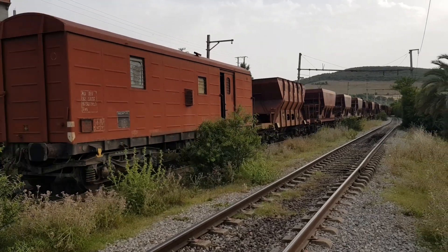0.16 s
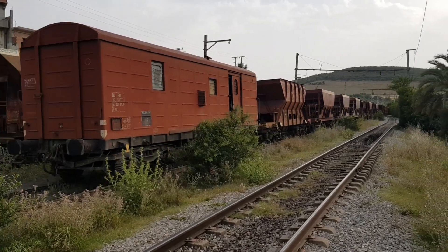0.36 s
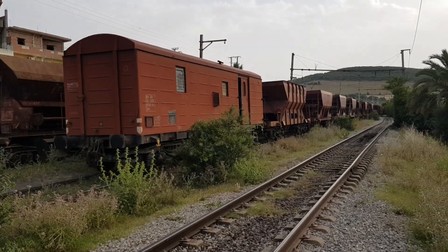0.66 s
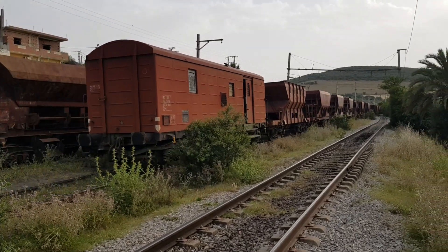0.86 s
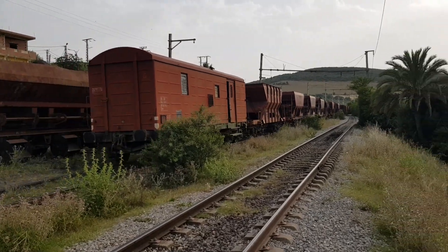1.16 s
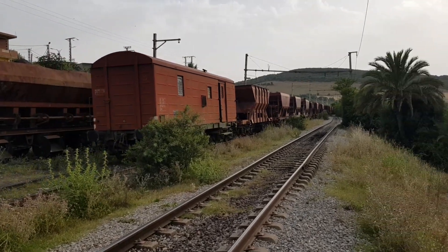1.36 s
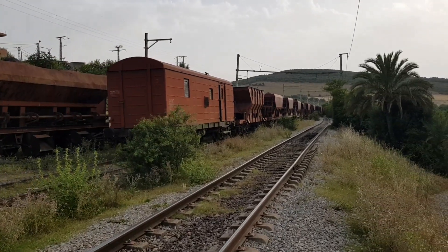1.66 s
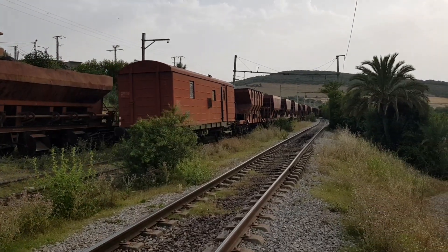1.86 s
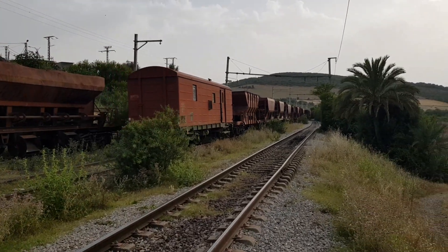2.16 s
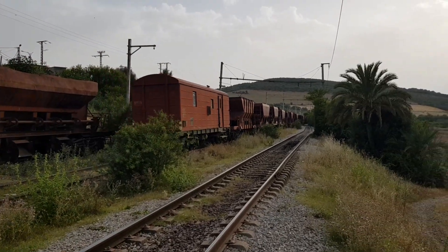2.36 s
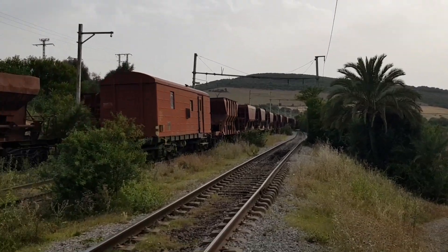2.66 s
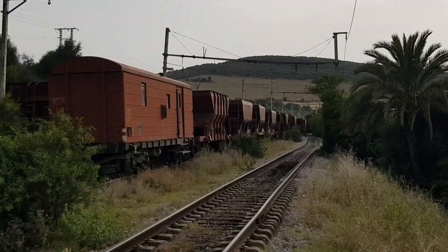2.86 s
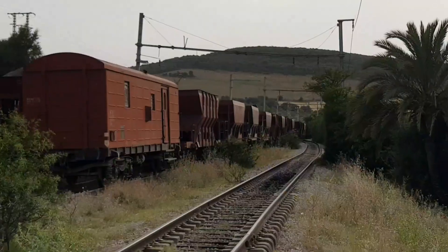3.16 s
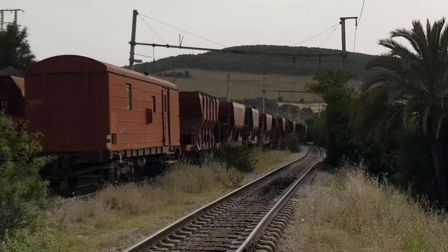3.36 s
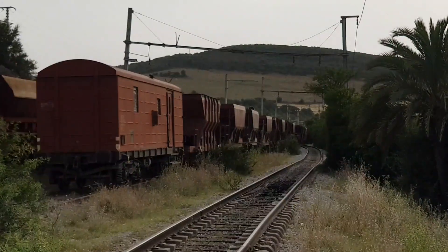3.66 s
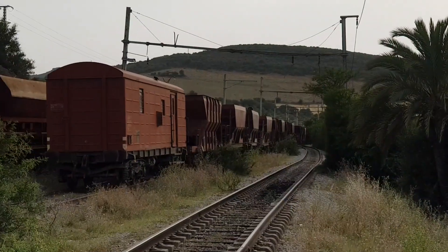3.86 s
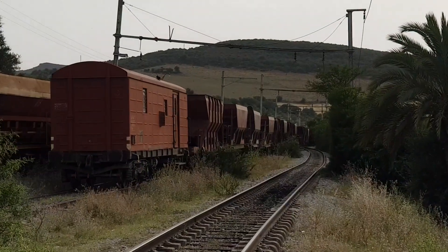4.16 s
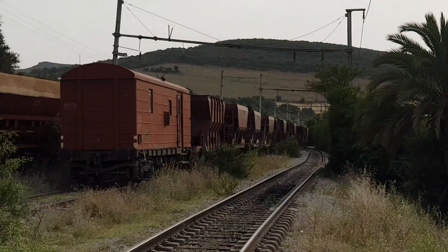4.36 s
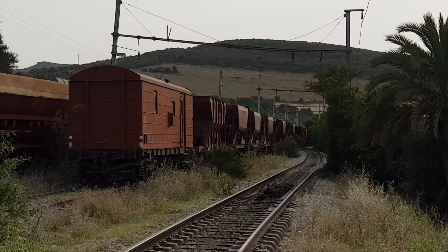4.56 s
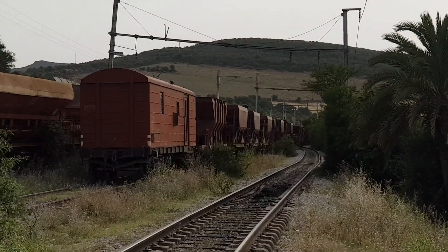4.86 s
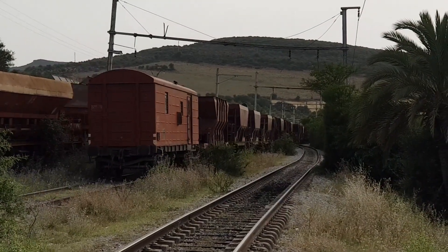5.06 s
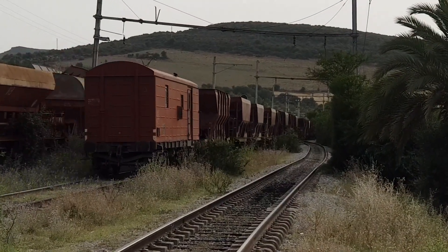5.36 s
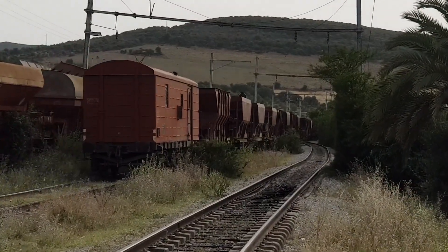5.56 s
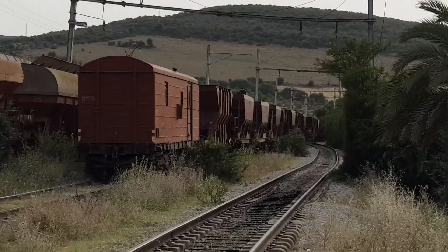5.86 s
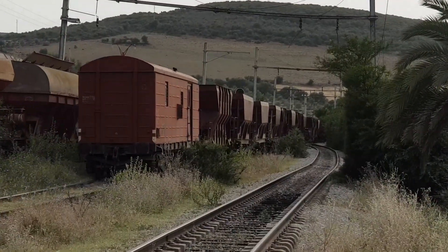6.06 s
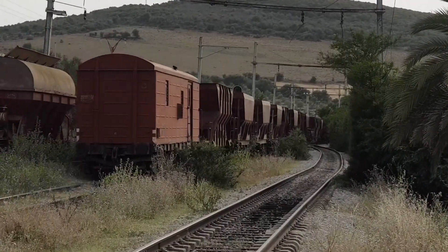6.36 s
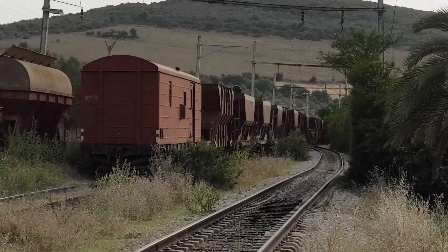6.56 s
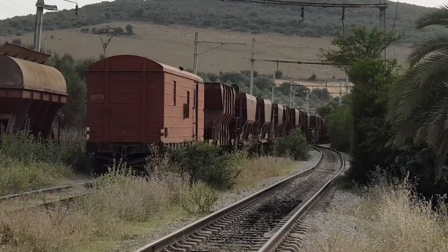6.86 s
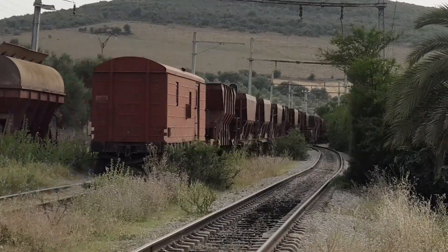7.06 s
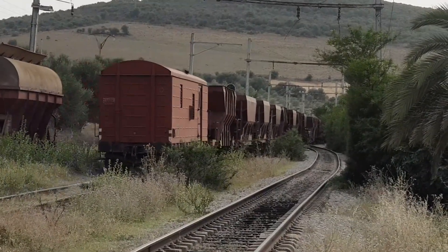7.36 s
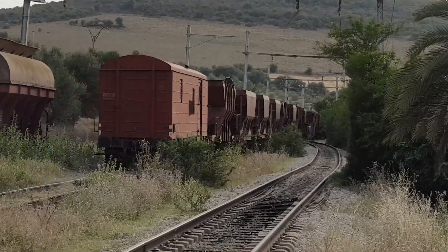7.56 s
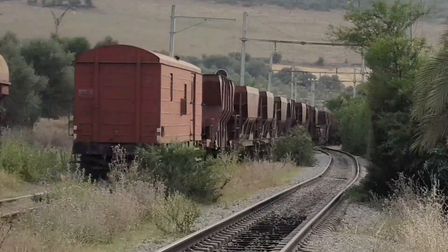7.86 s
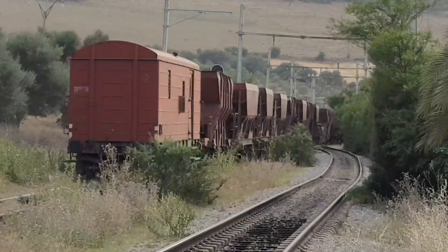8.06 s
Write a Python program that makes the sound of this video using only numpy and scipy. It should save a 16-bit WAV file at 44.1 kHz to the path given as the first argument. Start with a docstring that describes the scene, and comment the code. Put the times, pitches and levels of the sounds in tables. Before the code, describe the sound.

Close by the track, a hard steel clank rings out at once, followed by gritty flange scraping, thin squeals and chattering brake gear. The last freight wagons then roll slowly away with deep rumble, dull axle thumps, hollow body knocks and hissing, singing wheels. Smaller clanks return midway. Treble fades with distance, leaving low rumble, soft wind buffeting on the stereo microphone and a single tiny bird chirp at the end.

```python
"""From the lineside, some ten metres off, the tail of a loaded freight train rolls slowly away.
First comes a loud steel clank, a struck ring over bogie-frame modes; flanges scrape and squeal in grit and tones.
Wagons then rumble, thump and boom from grains and damped modes; wheels roar, sing and hiss in shaped noise,
and brake gear chatters in ticks. The grinding shifts left in the curve, then the treble fades with distance.
Noise gusts buffet the two-port microphone at times; near the end a bird chirps once, a falling tone."""
import sys
import numpy as np
from scipy import signal
from scipy.fft import rfft, irfft, next_fast_len
from scipy.io import wavfile
from scipy.ndimage import uniform_filter1d, map_coordinates

SR = 44100
rng = np.random.default_rng(int(sys.argv[2]) if len(sys.argv) > 2 else 0)


def file_out(sig):
    """Save sig as 16-bit WAV at sys.argv[1]."""
    # one column per channel
    cols = np.atleast_2d(sig).T
    # limit, then scale
    lim = np.clip(cols, -1, 1)
    pcm = np.round(lim * 32767).astype(np.int16)
    wavfile.write(sys.argv[1], SR, pcm)


N = 362502


def amp(db):
    """Decibels to gain."""
    return 10 ** (np.asarray(db) / 20)


def bins(size):
    """Frequencies in Hz of a spectrum of that many samples, kept just above zero for the logarithm."""
    return np.fft.rfftfreq(size, 1 / SR) + 1e-3


def along(table, hz):
    """Read (frequency, value) points on a log-frequency axis."""
    rows = np.array(table)
    return np.interp(np.log(hz), np.log(rows[:, 0]), rows[:, 1])


def noise():
    """Two unrelated white noises."""
    return rng.standard_normal((2, N))


def walk(rate):
    """Random levels held 1 / rate seconds and slewed from one to the next; spread near 1."""
    hold = max(int(SR / rate), 1)
    steps = np.repeat(rng.standard_normal(N // hold + 1), hold)
    return np.sqrt(3 / 2) * uniform_filter1d(steps, hold)[:N]


def grit(rate, spread_db, decay_s, share):
    """Noise partly broken into tiny impacts, so many a second and of very unequal size."""
    sizes_db = spread_db * np.minimum(rng.exponential(size=N), 4)
    hits = (rng.random(N) < rate / SR) * amp(sizes_db) ** 2
    energy = signal.lfilter([1], [1, -np.exp(-2 / (decay_s * SR))], hits)
    share = np.clip(share, 0, 1)
    return noise() * np.sqrt(1 - share + share * energy / energy.mean())


def strike(rise_s, t60):
    """Envelope that swells to 1, then loses 60 dB in t60 seconds."""
    t = np.arange(int(SR * (t60 + rise_s))) / SR
    decay = np.exp(-np.log(1000) * np.maximum(t - rise_s, 0) / t60)
    return np.minimum(t / rise_s, 1) * decay


def ring(hz, rise_s, t60):
    """One damped mode."""
    envelope = strike(rise_s, t60)
    return envelope * np.sin(2 * np.pi * hz * np.arange(len(envelope)) / SR)


def add(out, start_s, x):
    """Mix x into out from a given time."""
    i = max(int(start_s * SR), 0)
    out[..., i:i + x.shape[-1]] += x[..., :max(N - i, 0)]


# how alike the two microphone ports hear: (frequency [Hz], likeness [0-1])
PORT_LIKENESS = [(60, .9), (140, .86), (300, .98), (430, .78), (800, .8), (1050, .4), (1400, .55),
                 (1650, .25), (2050, .65), (2800, .35), (3700, .5), (5000, .25), (10000, .45), (15000, .35)]
# balance of the ports: (frequency [Hz], left minus right [dB])
PORT_LEAN = [(60, 0.5), (300, -0.7), (450, -1.5), (640, 4), (1000, -0.5), (1550, 1), (1900, -5),
             (2400, -8.5), (3200, -1), (4200, -1.5), (5300, 5), (6500, 9.5), (7900, 15), (9500, 9),
             (11600, 5), (15000, 15)]
# phase by which the left port leads; negative where it lags: (frequency [Hz], lead [rad])
PORT_LEAD = [(80, -.05), (280, -.2), (400, 0.06), (600, 1.0), (800, 0.4), (950, 1.1), (1350, 0.6),
             (1700, -1.7), (2000, -0.4), (2400, 1.4), (2800, 2), (3100, 1.1), (4000, 2.2), (6000, 1.3),
             (6400, .7)]


def radiate(pair, spectrum, modes=(), modes_db=0):
    """Two excitations pass a spectrum and its resonances to the two ports; unit level."""
    size = next_fast_len(pair.shape[-1], real=True)
    hz = bins(size)
    power = amp(along(spectrum, hz)) ** 2
    for centre, width, db in modes:
        power = power + amp(db + modes_db) ** 2 / (1 + ((hz - centre) / width) ** 2) ** 2
    mid, side = rfft(pair, size) * np.sqrt(power)
    alike = np.clip(along(PORT_LIKENESS, hz), -1, 1)
    mid, side = mid * np.sqrt(1 + alike), side * np.sqrt(1 - alike)
    lean = amp(along(PORT_LEAN, hz) / 2)
    left = (mid + side) * lean * np.exp(1j * along(PORT_LEAD, hz))
    right = (mid - side) / lean
    out = irfft(np.array([left, right]) / np.hypot(lean, 1 / lean), size)[:, :pair.shape[-1]]
    return out / out.mean(axis=0).std()


def place(tone, hz):
    """A narrow sound leans to the port that favours its pitch, with that pitch's phase lead."""
    lean = amp(along(PORT_LEAN, hz) / 2)
    analytic = signal.hilbert(tone, next_fast_len(len(tone)))[:len(tone)]
    left = np.real(analytic * np.exp(1j * along(PORT_LEAD, hz)))
    return np.array([left * lean, tone / lean]) * 2 / (lean + 1 / lean)


START_M, SPEED_M_S = 10.7, 2.81  # distance of the last wagon at the start, and its speed
FAR_S = 6.65  # from here on, far down the curve, the high sounds die away faster


def receding(start_db, loss_db, fade_db_per_s=0):
    """Gain of a steady sound losing loss_db per doubling of distance, and more once the train is far."""
    t = np.arange(N) / SR
    doublings = np.log2(1 + SPEED_M_S * t / START_M)
    return amp(start_db - loss_db * doublings - fade_db_per_s * np.maximum(t - FAR_S, 0))


def spells(rows, attack_s, release_s, arch_db=0):
    """Gain of overlapping (start, length, level) spells: attack, a hold that may arch, release."""
    t, power = np.arange(N) / SR, np.zeros(N)
    for s, length_s, db in rows:
        on = slice(max(int(s * SR), 0), int((s + length_s + release_s) * SR))
        age = t[on] - s
        arch = arch_db * (1 / 2 - np.minimum((2 * age / length_s - 1) ** 2, 1))
        edges = np.minimum(age / attack_s, 1 - (age - length_s) / release_s)
        power[on] += (amp(db + arch) * np.clip(edges, 0, 1)) ** 2
    return np.sqrt(power)


# a wheelset leans on the rail and rubs; levels before the arch of each rub:
# (start [s], length [s], rail roar [dB], hiss [dB], flange grinding [dB])
WHEELSET_RUBS = [(-0.03, 0.058, -41.5, -39, -46), (0.088, 0.19, -40.5, -39, -37.5),
                 (0.332, 0.13, -52, -48, -54), (0.907, 0.16, -46, -42, -51),
                 (1.12, 0.096, -45.5, -49.5, -56), (1.241, 0.076, -46.5, -42, -60),
                 (1.426, 0.24, -47, -51, -67), (1.846, 0.13, -48.5, -46.5, -58),
                 (2.178, 0.15, -51, -45.5, -49.5), (2.407, 0.25, -45.5, -50, -50),
                 (3.106, 0.047, -49, -41.5, -56), (3.19, 0.14, -69, -51.5, -56),
                 (3.43, 0.26, -64, -50, -55), (3.75, 0.087, -54, -49, -61), (4.043, 0.36, -48.5, -48, -60),
                 (4.377, 0.18, -46, -44, -47.5), (4.606, 0.16, -48, -46.5, -52.5),
                 (4.684, 0.14, -46.5, -47.5, -50), (4.878, 0.17, -60, -49, -50.5),
                 (5.02, 0.19, -54, -64, -51), (5.37, 0.22, -50.5, -57, -60),
                 (5.754, 0.32, -52.5, -61, -52.5), (6.105, 0.27, -51.5, -71, -61),
                 (6.305, 0.46, -47.5, -52.5, -57), (6.853, 0.19, -52, -50.5, -56.5),
                 (7.4, 0.032, -62, -56, -62)]


def rubbing(column):
    """Gain of the rubs in one of their level columns."""
    rows = [(row[0], row[1], row[column]) for row in WHEELSET_RUBS]
    return spells(rows, attack_s=0.017, release_s=0.082, arch_db=3.5)


def shimmer(x, depth_db, spacing_hz, hold_s):
    """Many wheels and paths give a fine, changing ripple of peaks, while broader resonances ring in turns."""
    hz, s, frames = signal.stft(x, SR, nperseg=2048, noverlap=1536)

    def ripple(step_hz, step_s):
        """A smooth random surface over frequency and time."""
        where = np.meshgrid(hz / step_hz, s / step_s, indexing="ij")
        return map_coordinates(rng.standard_normal(size=(600, 120)), where, order=3, mode="wrap")

    turns_db = 1.3 * ripple(step_hz=330, step_s=.5)
    gain = amp(depth_db * ripple(spacing_hz, hold_s) + turns_db)
    level_frames = frames * gain / np.sqrt(np.mean(gain ** 2))
    return signal.istft(level_frames, SR, nperseg=2048, noverlap=1536)[1][:, :N]


def drift(pair, shift_db):
    """The treble moves toward the left port as the wagons enter the curve; the summed level stays."""
    # shift_db is left minus right, before and after
    lean = amp(np.interp(np.arange(N) / SR, (4.25, 4.6), shift_db) / 2)
    leaned_power = (pair[0].var() * lean ** 2 + pair[1].var() / lean ** 2) / 2
    return pair * np.array([lean, 1 / lean]) * pair.std() / np.sqrt(leaned_power)


# spectrum of the ground rumble: (frequency [Hz], relative power per Hz [dB])
RUMBLE_SPECTRUM = [(18, -37), (28, -41), (36, -12), (45, -1.5), (62, -0.5), (82, 0.5), (102, -6),
                   (140, -7.5), (200, -11.5), (260, -20.5), (340, -22), (570, -76)]
# spectrum of the hollow bodies: (frequency [Hz], relative power per Hz [dB])
BOOM_SPECTRUM = [(150, -22.5), (230, -5.5), (270, -0.5), (318, -1), (355, -4.5), (400, -16.5), (480, -73),
                 (800, -73)]
# the wagons lurch and the rumble swells: (start [s], length [s], level [dB])
WAGON_LURCHES = [(0.1, 0.33, -38), (0.68, 0.64, -33.5), (1.58, 0.044, -25), (2.08, 0.73, -32.5),
                 (3.05, 0.11, -32), (4.2, 0.3, -36), (5.17, 0.43, -31.5), (6.28, 0.29, -36),
                 (6.72, 0.32, -32), (7.5, 0.18, -32.5)]
# the hollow wagon bodies drum, before the boom's trim: (start [s], length [s], level [dB])
BODY_DRUMMING = [(0.1, 0.25, -37), (0.33, 0.84, -37.5), (1.2, 0.43, -32.5), (1.83, 0.4, -34),
                 (2.48, 0.726, -34.5), (3.43, 0.52, -35.5), (3.97, 0.53, -32)]
# knocks that boom in the bodies, before their trim: (time [s], level [dB], pitch [Hz])
BODY_KNOCKS = [(0.104, -23, 328), (0.178, -16, 258), (0.632, -16, 272), (1.3, -13.5, 302), (1.44, -15, 308),
               (1.529, -17, 256), (2.149, -11.5, 324.4), (2.809, -20, 311), (2.899, -12.5, 306),
               (3.43, -13, 304), (3.678, -17.5, 310), (3.783, -17, 343), (4.114, -12, 332),
               (4.232, -17, 328), (4.299, -17.5, 293), (4.717, -20.5, 264), (7.912, -27, 224)]
# heavy thumps of the axles, before their trim: (time [s], level [dB], pitch [Hz])
AXLE_THUMPS = [(0.103, -16, 129), (0.931, -8.5, 77), (1.044, -7.5, 78.7), (1.609, -17, 81),
               (2.089, -11.5, 93.5), (2.401, -13, 123), (2.567, -9, 78), (3.069, -17, 57),
               (4.228, -7.5, 79), (4.455, -10.5, 70), (4.71, -14, 132), (5.587, -8.5, 86.6),
               (6.36, -16, 151), (6.551, -16.5, 152), (6.971, -15, 73), (7.272, -11.5, 95),
               (7.608, -12, 84), (7.92, -9, 76.6)]


def wagons():
    """Axles shake the ground and the frames; a jumble of knocks booms in the hollow bodies."""
    lurching = spells(WAGON_LURCHES, attack_s=0.0079, release_s=0.062)
    rumble_gain = np.hypot(receding(start_db=-29.5, loss_db=0.9), lurching)
    drumming = spells(BODY_DRUMMING, attack_s=0.0084, release_s=0.02)
    boom_gain = amp(-1.0) * np.hypot(receding(start_db=-35, loss_db=4.86), drumming)
    out = radiate(grit(36, 1.1, 0.056, 0.036), RUMBLE_SPECTRUM) * rumble_gain
    out += radiate(grit(45, 0.74, 0.011, 0.3), BOOM_SPECTRUM) * boom_gain
    for s, db, hz in BODY_KNOCKS:
        add(out, s - .003, amp(db - 6.5) * ring(hz, 0.0061, 0.15))
    for s, db, hz in AXLE_THUMPS:
        add(out, s - .003, amp(db - 8.5) * ring(hz, 0.019, 0.15))
    return out


# mode levels here are before the offset each layer gives them
# resonances of the rail under rolling: (frequency [Hz], width [Hz], level [dB])
RAIL_RESONANCES = [(500, 94, -3.5), (806, 79, 2), (1098, 110, -2), (1352, 75, -5.5), (1600, 57, -12.5)]
# lowest wheel modes, which sing all the time: (frequency [Hz], width [Hz], level [dB])
SINGING_MODES = [(1970, 82, 9), (2210, 100, 0), (2185, 82, 3.5), (2608, 44, 7.5)]
# higher modes of the wheel discs: (frequency [Hz], width [Hz], level [dB])
DISC_MODES = [(3130, 56, -1), (3990, 130, 6), (4730, 23, 8.5), (5250, 83, 5), (5640, 54, -5),
              (6210, 17, 10), (6800, 380, 3), (7600, 35, -2), (9770, 120, -5.5), (11500, 130, -5),
              (12138, 70, -10), (13610, 50, -10), (14186, 60, -2), (14810, 60, -4)]
# spectrum of the rail roar: (frequency [Hz], relative power per Hz [dB])
ROAR_SPECTRUM = [(250, -12), (420, 2), (620, -1.5), (950, -9.5), (1450, -0.5), (1700, -8.5), (2400, -12.5),
                 (3500, -16), (6000, -62)]
# spectrum of the singing wheels: (frequency [Hz], relative power per Hz [dB])
SING_SPECTRUM = [(1400, -38), (1750, -2), (1950, 6), (2400, 1), (2800, -3.5), (3400, -14), (5000, -37)]
# spectrum of the fine hiss: (frequency [Hz], relative power per Hz [dB])
HISS_SPECTRUM = [(2000, -4), (2800, 1), (3200, 4.5), (3700, 1), (5200, -2), (5700, -3), (6900, -6),
                 (7400, -14), (7900, -18), (12000, -20), (16000, -34)]


def rolling():
    """Rough treads make the rail roar and the wheels sing, a finer hiss on top; rubs swell all three."""
    rub = rubbing(column=2)
    roar_gain = np.hypot(receding(start_db=-42, loss_db=3.42), rub) * amp(0.23 * walk(23))
    roar_grains = grit(82, 0.93, 0.046, 0.42)
    roar = radiate(roar_grains, ROAR_SPECTRUM, RAIL_RESONANCES, modes_db=1.5) * roar_gain

    # the singing is 1 dB weaker at first
    early = amp(np.interp(np.arange(N) / SR, (2, 2.03), [-1, 0]))
    steady_sing = receding(start_db=-43.5, loss_db=5, fade_db_per_s=2.5)
    sing_gain = early * np.hypot(steady_sing, amp(-2) * rub) * amp(0.79 * walk(21))
    sing_grains = grit(110, 1.6, 0.032, 0.44)
    sing = radiate(sing_grains, SING_SPECTRUM, SINGING_MODES, modes_db=-1.0) * sing_gain

    steady_hiss = receding(start_db=-46, loss_db=3.6, fade_db_per_s=3)
    hiss_gain = np.hypot(steady_hiss, rubbing(column=3)) * amp(0.8 * walk(22))
    fine_grains = grit(200, 2.6, 0.012, 0.42)
    hiss = radiate(fine_grains, HISS_SPECTRUM, DISC_MODES[:6], modes_db=-9.0) * hiss_gain

    low = shimmer(roar + sing, depth_db=2.0, spacing_hz=69.6, hold_s=.2)
    high = shimmer(hiss, depth_db=3.0, spacing_hz=79.96, hold_s=.2)
    return low + drift(high, shift_db=(-0.5, 1.8))


# spectrum of steel grinding on steel: (frequency [Hz], relative power per Hz [dB])
GRIND_SPECTRUM = [(1500, -25), (3200, 1.5), (5000, 7.5), (7000, 7.5), (7900, -2), (9000, 3.5), (10500, -1),
                  (12000, 5), (14000, 2), (16000, -7)]
# flanges catching the rail, before their trim: (time [s], level [dB], rise [s], decay by 60 dB [s])
FLANGE_SCRAPES = [(0.095, -25.5, 0.0017, 0.098), (.113, -24, .002, .06), (.166, -31, .003, .08),
                  (0.22, -22, 0.013, 0.23), (.255, -29, .005, 0.11), (.303, -30.5, 0.0035, 0.27),
                  (.441, -40, 0.0027, 0.078), (.930, -41, .003, 0.081), (1.256, -40, 0.013, 0.25),
                  (1.857, -37.5, 0.0063, 0.079), (1.942, -48, 0.0028, .15), (2.184, -42, .002, 0.088),
                  (2.358, -43.5, .003, 0.27), (2.495, -43, .005, 0.34), (3.114, -36.5, 0.0079, 0.16),
                  (3.191, -45, 0.0028, .1), (3.237, -48, .004, .14), (3.50, -44, .01, 0.16),
                  (4.397, -49, .005, 0.27), (4.47, -46, 0.007, 0.33), (4.745, -39, 0.0087, 0.44),
                  (5.677, -47.5, .003, 0.37), (5.828, -42.5, 0.005, 0.25), (5.985, -41.5, 0.0033, 0.3)]


def flanges():
    """Flanges grind on the rail head in gritty slips that ring the wheel discs, and now and then catch hard."""
    catches = np.zeros(N)
    for s, db, rise_s, t60 in FLANGE_SCRAPES:
        add(catches, s, (amp(db - 1.0) * strike(rise_s, t60)) ** 2)
    steady = receding(start_db=-59.5, loss_db=2.5, fade_db_per_s=19)
    unevenness_db = 1.1 * walk(25)
    rub = np.hypot(steady, rubbing(column=4)) * amp(unevenness_db)
    grains = grit(200, 2.6, 0.0055, 0.42)
    steel = radiate(grains, GRIND_SPECTRUM, DISC_MODES, modes_db=8.0)
    rippled = shimmer(steel, depth_db=3.5, spacing_hz=89.44, hold_s=0.14)
    return drift(rippled * np.sqrt(rub ** 2 + catches), shift_db=(-2.5, 2.5))


# short squeals and rasps of single wheel modes, before their flutter:
# (start [s], length [s], pitch [Hz], level [dB], pitch waver [Hz])
WHEEL_SQUEALS = [(.11, .11, 3271, -33.5, 15), (.16, .09, 3915, -35.5, 15), (.20, .08, 4440, -32.5, 15),
                 (.225, .07, 3130, -38, 90), (.225, .06, 12985, -30.5, 15), (.23, .06, 13625, -39, 20),
                 (.225, .06, 7570, -39, 20), (.23, .06, 12140, -39, 20), (.23, .07, 7390, -33, 20),
                 (.235, .05, 5850, -37, 60), (.255, .025, 5253, -31, 20), (.28, .09, 12985, -36, 15),
                 (.29, .068, 5253, -30.5, 12), (.305, .05, 5760, -44, 25), (.29, .08, 3050, -42, 90),
                 (.325, .11, 2478, -37, 12), (.42, .18, 2478, -39.5, 14), (.7, 1.0, 1320, -51, 20),
                 (1.145, .066, 1330, -33.5, 28), (1.207, .026, 1315, -36.5, 18),
                 (1.245, .035, 3080, -41, 20), (2.425, .04, 2030, -35, 60), (2.55, .5, 1990, -46, 35),
                 (2.575, .05, 4387, -41, 30), (3.565, .05, 3946, -44, 50), (4.39, .14, 3070, -40, 55),
                 (4.40, .11, 3300, -38, 25), (4.44, .06, 3520, -40, 50), (4.39, .14, 4620, -45.5, 70),
                 (4.42, .1, 6130, -45, 25), (4.70, .075, 1976, -33.5, 25), (4.70, .11, 4673, -43.5, 15),
                 (4.72, .06, 5216, -45, 20), (4.73, .06, 6368, -46, 40), (6.52, .1, 3070, -48, 25),
                 (6.82, .09, 3100, -50, 25), (6.23, .09, 1965, -44, 14), (6.35, .06, 1935, -44, 20),
                 (6.70, .1, 1973, -41.5, 16), (6.90, .06, 1950, -42, 20), (6.97, .1, 1985, -46, 20)]


def squeals():
    """Stick-slip locks briefly onto one wheel mode, wavering in pitch and strength; wide waver rasps."""
    out, waver, flutter = np.zeros((2, N)), walk(400), amp(1.8 * walk(70))
    for s, length_s, hz, db, waver_hz in WHEEL_SQUEALS:
        swell = signal.windows.tukey(int(length_s * SR), .8)
        # each squeal reads its own random stretch of waver and flutter
        own = rng.integers(N - len(swell)) + np.arange(len(swell))
        tone = np.sin(2 * np.pi * np.cumsum(hz + waver_hz * waver[own]) / SR)
        add(out, s, place(amp(db) * swell * flutter[own] * tone, hz))
    return out


# steel blows at joints and couplings; ring and frame are relative to the blow:
# (time [s], blow level [dB], ring pitch [Hz], ring [dB], frame [dB], rattle decay by 60 dB [s])
STEEL_BLOWS = [(0.0964, -15, 2130, 8, -3.5, 0.11), (0.0987, -13, 2470, 6.5, -11, 0.07),
               (.1040, -17, 200, 7, -8, 0.1), (.110, -18, 1250, -3, -11, 0.09),
               (0.1211, -17, 1950, 1, -11, 0.11), (.126, -19, 2500, 0, -11, .2),
               (.140, -25, 2250, 0, -11, .26), (0.79, -37, 1250, 0, -4, .2), (1.121, -32, 580, 4, -12, .2),
               (2.090, -33, 1000, 1, -4, .3), (2.391, -39, 2450, 9, -6, .09), (2.400, -34, 950, 3, -9, .2),
               (2.421, -27, 2100, 6, -6, .15), (2.426, -28, 1360, -1, -6, .2),
               (2.436, -33, 450, 4, -5, .15), (2.546, -37, 1400, 4, -6, .2),
               (3.12, -37, 1400, -1, -10, 0.3), (3.4465, -33, 1390, -3, -9, 0.27),
               (4.395, -35, 1440, -2, -5, 0.6), (4.667, -39, 1260, 7.5, -8, 0.3),
               (4.7243, -32, 2000, 6, -7, 0.26), (6.489, -36, 1490, 2, -7, 0.22)]
# modes of the bogie frame, before random detune and size:
# (frequency [Hz], level [dB], decay by 60 dB [s])
BOGIE_MODES = [(328, -3, .07), (434, -4, .06), (580, -6, .05), (673, -3, .04), (903, -6, .045),
               (1360, -5, .05), (1856, -8, .04), (2650, -9, .04), (3060, -10, .05), (3600, -8, .04),
               (4020, -6, .035), (5590, -12, .025)]
# spectrum of the rattling steel: (frequency [Hz], relative power per Hz [dB])
STEEL_SPECTRUM = [(100, -5), (400, 4), (800, 1), (1600, -4), (2200, 4), (2800, -10), (3600, 0.5),
                  (6500, -14), (8500, -42), (15000, -30)]


def clanks():
    """Each blow is a short hard ring that shakes the bogie frame, then the loose steel rattles on."""
    out, rattle = np.zeros((2, N)), np.zeros(N)
    for s, db, hz, ring_db, frame_db, t60 in STEEL_BLOWS:
        add(out, s, place(amp(db + ring_db) * ring(hz, .0012, .17 * t60), hz))
        chances = rng.standard_normal((len(BOGIE_MODES), 3))
        for (mode_hz, mode_db, mode_t60), (size_db, detune, side) in zip(BOGIE_MODES, chances):
            tone = np.sign(side) * ring(mode_hz * (1 + .015 * detune), .001, mode_t60)
            add(out, s, place(amp(db + frame_db + mode_db + size_db) * tone, mode_hz))
        add(rattle, s, (amp(db - 8) * strike(.0015, t60)) ** 2)
    grains = grit(760, 6.5, 0.003, 0.5)
    steel = radiate(grains, STEEL_SPECTRUM, RAIL_RESONANCES + SINGING_MODES, modes_db=1)
    return out + steel * np.sqrt(rattle)


TICKS_PER_S, TICK_SPREAD_DB = 300, 4
# spells of chattering brake gear, tick level before its random spread:
# (start [s], length [s], tick level [dB], lowest pitch [Hz], highest pitch [Hz])
BRAKE_CHATTER = [(.14, .21, -41, 1900, 3000), (.16, .19, -38, 2900, 5600), (.225, .055, -37, 9000, 15500),
                 (.34, .11, -48, 2500, 7000), (2.44, .2, -46, 2000, 5200), (2.55, .065, -46, 1900, 2350),
                 (4.39, .15, -45, 1900, 3600), (4.73, .1, -47, 2000, 7000)]


def clatter():
    """Loose brake gear chatters: a dense run of unequal ticks, each ringing briefly at its own pitches."""
    out = np.zeros((2, N))
    for s, length_s, db, low_hz, high_hz in BRAKE_CHATTER:
        for slot_s in np.arange(s, s + length_s, 1 / TICKS_PER_S):
            at_s = slot_s + rng.random() / TICKS_PER_S
            size_db = db + TICK_SPREAD_DB * rng.uniform(-1, 1)
            for hz in low_hz * (high_hz / low_hz) ** rng.random(size=3):
                add(out, at_s, place(amp(size_db) * ring(hz, rise_s=.001, t60=.04), hz))
    return out


# gusts buffeting the microphone, on top of the breeze: (middle [s], length [s], peak level [dB])
WIND_GUSTS = [(1.875, 0.19, -29.5), (2.474, 0.52, -32), (3.018, 0.57, -35), (4.29, 0.71, -34),
              (7.377, 0.97, -30), (8.106, 0.6, -33)]
# spectrum of wind at the ports: (frequency [Hz], relative level per Hz [dB])
WIND_SPECTRUM = [(18, -32), (30, -19), (42, -20), (60, -0.5), (85, 0), (130, -4.5), (200, -12), (320, -33),
                 (600, -48), (1500, -107)]


def wind(breeze_db=-61):
    """Eddies hit each port on its own; gusts swell and sink over a light breeze."""
    force = np.full(N, amp(breeze_db))
    for s, length_s, db in WIND_GUSTS:
        add(force, s - length_s / 2, amp(db) * signal.windows.hann(int(length_s * SR)))
    eddies = irfft(rfft(noise()) * amp(along(WIND_SPECTRUM, bins(N))), N)
    return eddies / eddies.std() * force


def bird(start_s=7.885, length_s=0.028, from_hz=5050, to_hz=3800, db=-53):
    """One faint chirp, a tone falling smoothly in pitch, equal at both ports."""
    out = np.zeros((2, N))
    hz = np.geomspace(from_hz, to_hz, int(length_s * SR))
    tone = np.sin(2 * np.pi * np.cumsum(hz) / SR)
    add(out, start_s, amp(db) * signal.windows.tukey(len(hz)) * tone)
    return out


def scene():
    """Everything in the open air, from the train beside the microphone to the background."""
    train = wagons() + rolling() + flanges() + squeals() + clanks() + clatter()
    return train + wind() + bird()


def record(dry):
    """The recorder cuts the top with a steep low-pass."""
    low_pass = signal.ellip(10, .2, 80, 15700, fs=SR, output="sos")  # ripple dB, stop dB, edge Hz
    return signal.sosfilt(low_pass, dry)


dry = scene()
out = record(dry)
file_out(out)
```